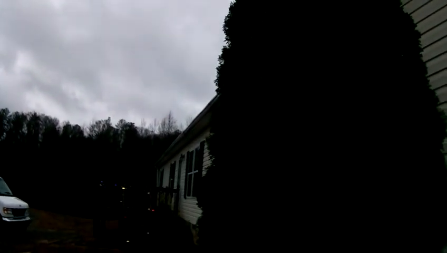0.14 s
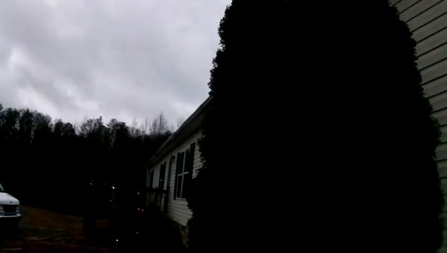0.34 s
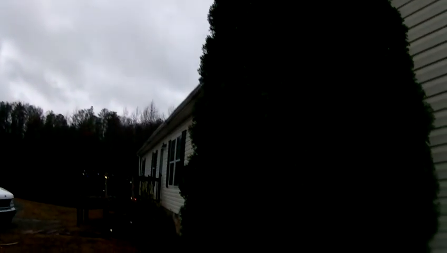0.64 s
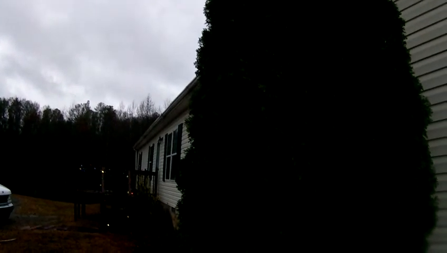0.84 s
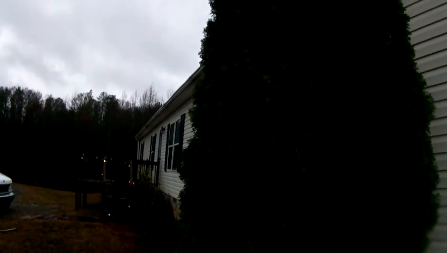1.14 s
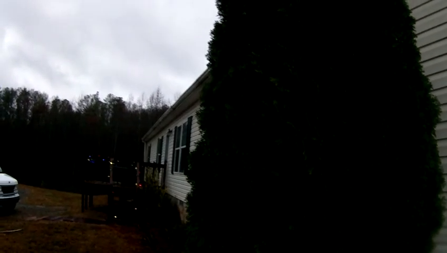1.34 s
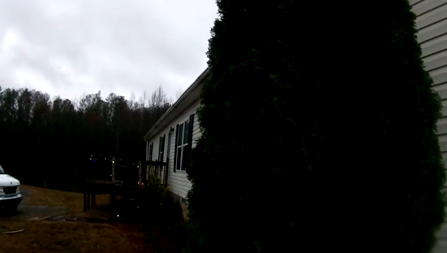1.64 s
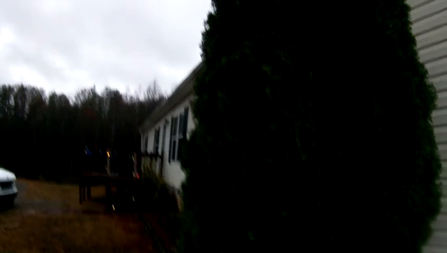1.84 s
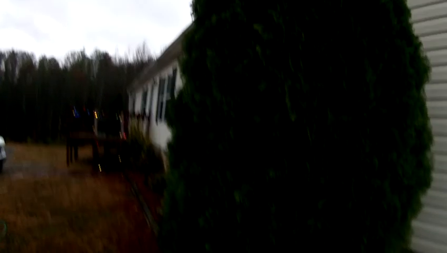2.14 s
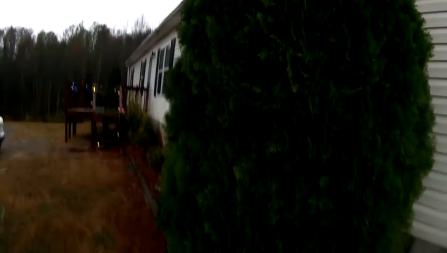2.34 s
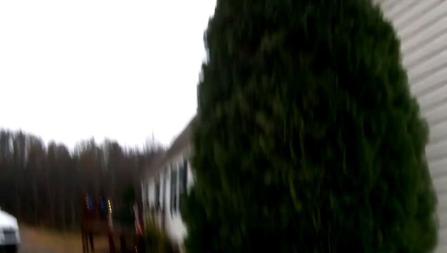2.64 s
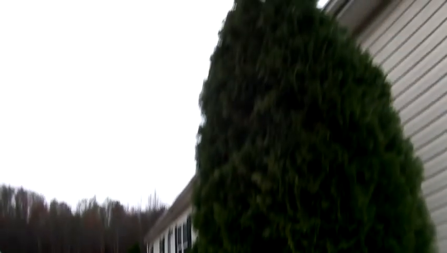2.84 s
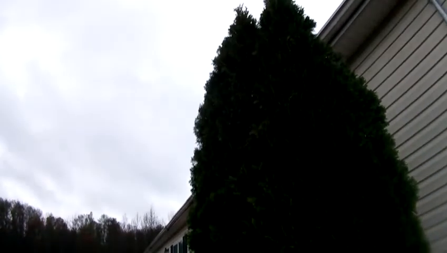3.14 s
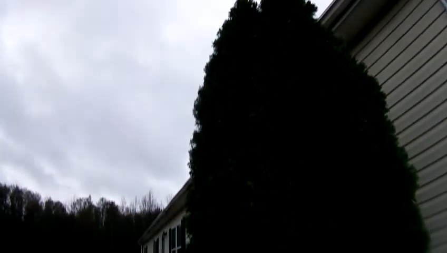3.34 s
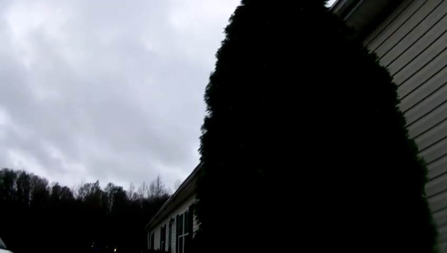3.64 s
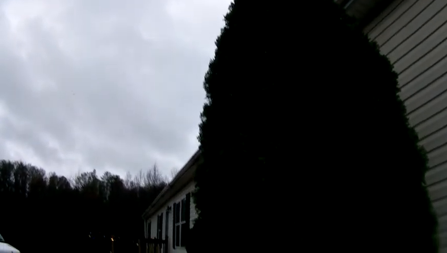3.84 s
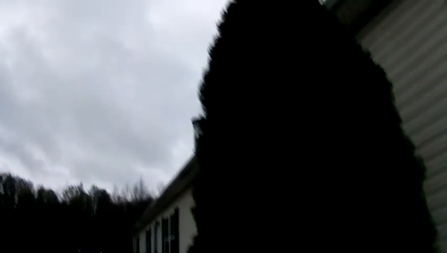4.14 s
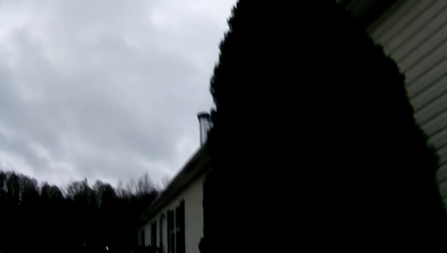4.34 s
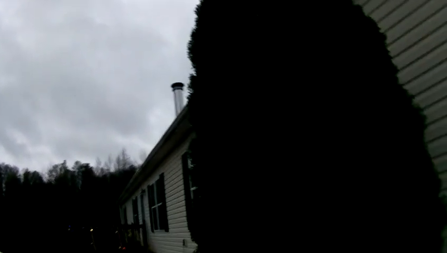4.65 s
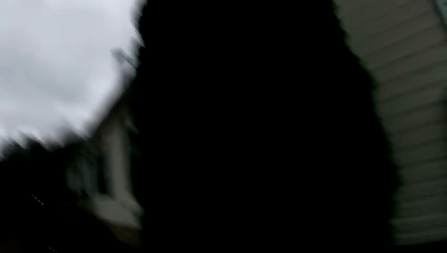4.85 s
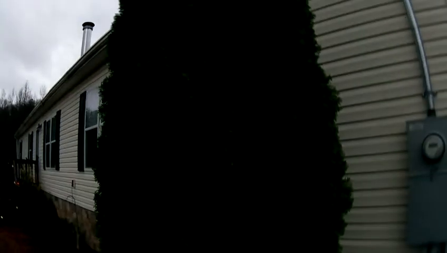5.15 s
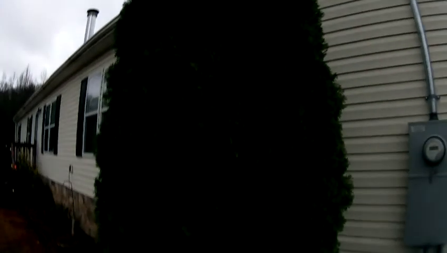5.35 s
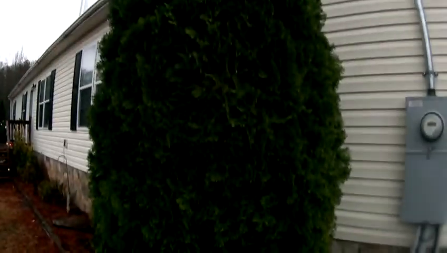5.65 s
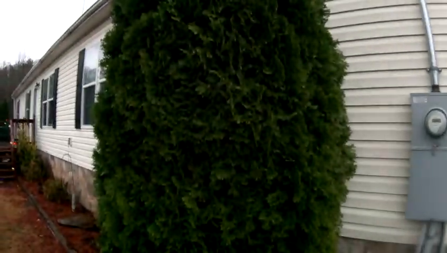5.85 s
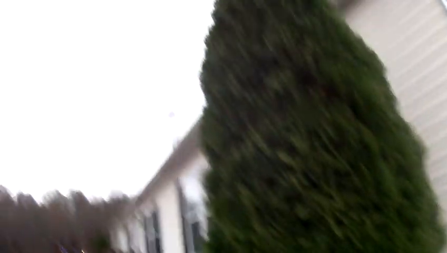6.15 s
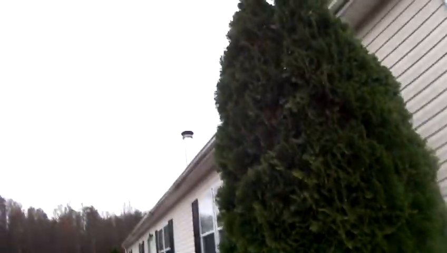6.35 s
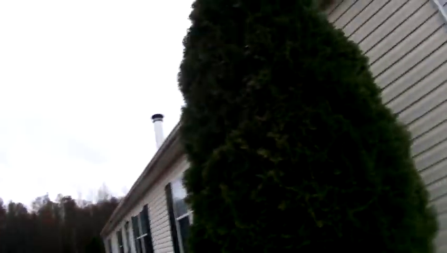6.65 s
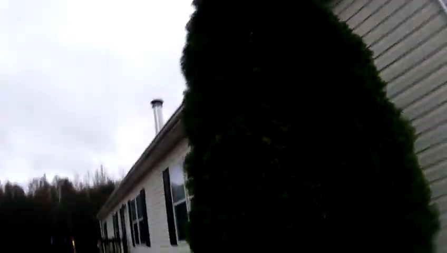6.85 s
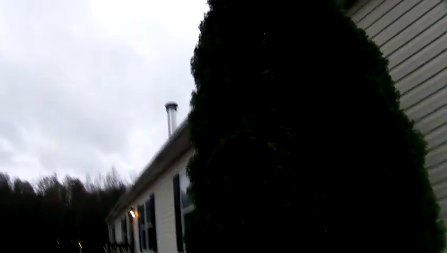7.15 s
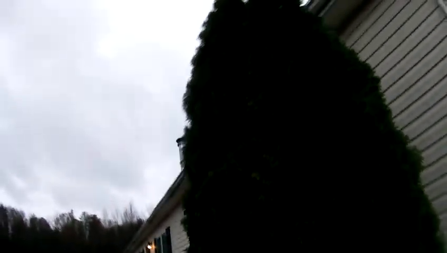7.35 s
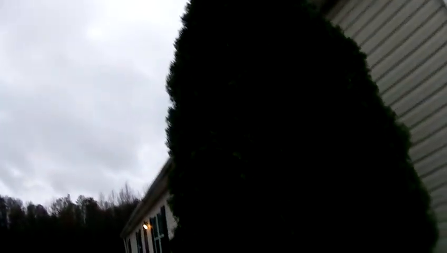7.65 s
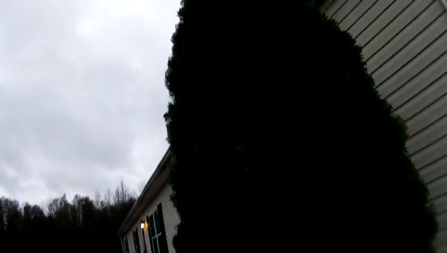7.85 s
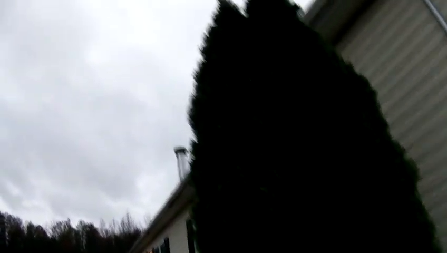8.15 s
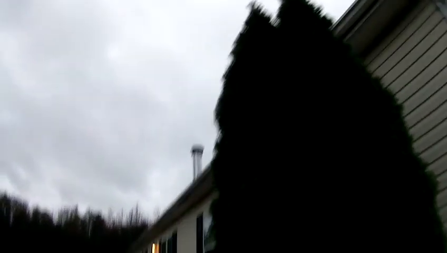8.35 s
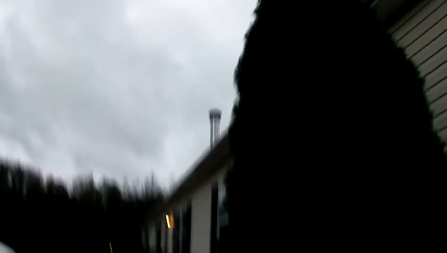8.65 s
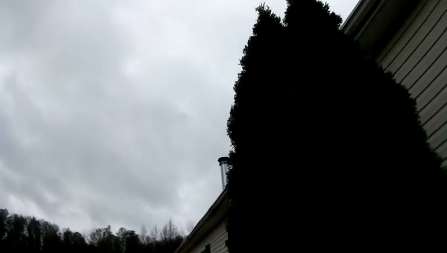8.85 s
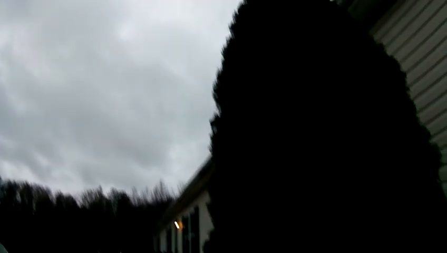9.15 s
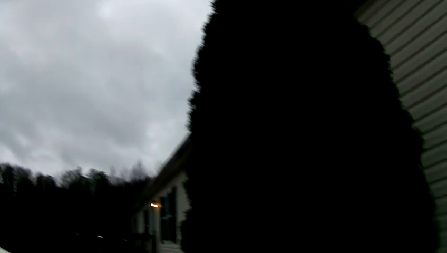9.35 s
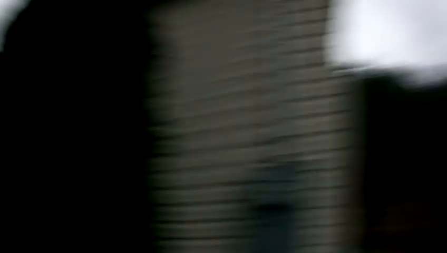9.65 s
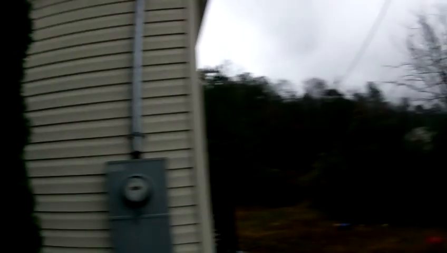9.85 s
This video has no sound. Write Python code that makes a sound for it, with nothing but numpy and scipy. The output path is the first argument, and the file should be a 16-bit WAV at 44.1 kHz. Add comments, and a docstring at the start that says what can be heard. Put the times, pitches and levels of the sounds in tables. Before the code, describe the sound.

Outdoors beside a house, light rain falls in scattered drops on and around a hand-held microphone. Fine drops tick crisply, fat ones thud and tock with a thin zing, over faint distant patter. Low wind rumble, trees and wet hiss continue throughout. Bass gusts buffet early and again past eight seconds, with small taps and grip rubs in the second half.

```python
"""Light rain by a house

Sparse drops land on and right around a hand-held camera: fat ones thud and tock as decaying surface
modes, fine ones tick as noise splashes with a brief high ring, and random pips and splashes patter behind.
Shaped noise makes a low rumble, wind in the trees, wet hiss and a few bass gusts on the single microphone.
Damped modes make soft low thumps as gusts strike it and dull taps on the housing; the shifting grip rubs
and scratches in short noise strokes."""
import sys
import numpy as np
from scipy import signal
from scipy.fft import rfft, irfft, next_fast_len
from scipy.io import wavfile
from scipy.ndimage import map_coordinates

SR = 44100
rng = np.random.default_rng(int(sys.argv[2]) if len(sys.argv) > 2 else 0)


def waveform_to_disk(signal):
    """Save audio, clipped to [-1, 1], as 16-bit WAV at the path in sys.argv[1]."""
    frames = np.transpose(np.atleast_2d(signal))
    scaled = np.clip(frames, -1, 1) * 32767
    samples = np.round(scaled).astype(np.int16)
    wavfile.write(sys.argv[1], SR, samples)


N = 441000
DROP_TIME_S = np.arange(SR // 10) / SR  # time within one short sound


def amp(db):
    """Decibels to gain."""
    return 10 ** (np.asarray(db) / 20)


def unit(x):
    """Scale to rms 1."""
    return x / np.sqrt(np.mean(x ** 2) + 1e-20)


def burst(x):
    """Scale a short sound to the energy of 10 ms at rms 1."""
    return x * np.sqrt(SR / 100 / (np.sum(x ** 2) + 1e-20))


def wobble(knots_per_s):
    """Smooth random curve through normally distributed knots."""
    knots = rng.standard_normal(int(N * knots_per_s / SR) + 4)
    return map_coordinates(knots, [np.arange(N) * knots_per_s / SR])


def coloured(x, points):
    """Causal minimum-phase filter whose gain follows (Hz, dB) points on a log-frequency axis."""
    m = 2 * next_fast_len(N // 2 + SR // 10)
    hz, db = np.transpose(points)
    log_hz = np.log(np.fft.rfftfreq(m, 1 / SR) + 1)
    gain = amp(np.interp(log_hz, np.log(hz), db))
    # folding the cepstrum onto positive time gives minimum phase
    cepstrum = irfft(np.log(gain), m)
    cepstrum[1:m // 2] *= 2
    cepstrum[m // 2 + 1:] = 0
    response = np.exp(rfft(cepstrum))
    return irfft(rfft(x, m) * response, m)[:N]


def noise(points):
    """Coloured noise of rms 1."""
    return unit(coloured(rng.standard_normal(N), points))


def add(track, start_s, sound):
    """Mix a sound into a track, cut at the track's end."""
    start = int(np.clip(round(start_s * SR), 0, N - 1))
    track[start:start + len(sound)] += sound[:N - start]


def ring(hz, cycles, rise, linger_db):
    """Surface mode: swells over rise cycles, falls 60 dB in cycles, plus a tail falling half as fast."""
    turns = hz * DROP_TIME_S
    fall = amp(-60 * turns / cycles)
    tail = amp(linger_db - 30 * turns / cycles)
    swell = 1 - np.exp(-turns / rise)
    motion = np.sin(2 * np.pi * turns) * (fall + tail) * swell
    return burst(np.diff(motion, prepend=0))  # pressure follows the surface's speed


def splash(hz, t60_s, spray_db, spray_t60_s):
    """Band-passed noise: the drop bursts in a sharp crack, then its spray settles."""
    crack = amp(-60 * DROP_TIME_S / t60_s)
    spray = amp(spray_db - 60 * DROP_TIME_S / spray_t60_s)
    band_hz = np.clip([hz / 2, hz * 2], [100, 1000], [9000, 19000])
    b, a = signal.butter(1, band_hz, "bandpass", fs=SR)
    return burst(signal.lfilter(b, a, rng.standard_normal(len(DROP_TIME_S)) * (crack + spray)))


# Noise spectra, level set separately. Each row: frequency in Hz, relative density in dB per Hz.
RUMBLE_SPECTRUM = [(10, -27.5), (22, -3), (50, -1.5), (95, -0.5), (135, -5), (190, -13), (400, -29),
                   (900, -63.5)]
TREES_SPECTRUM = [(60, -24), (150, -2), (250, -1), (400, -6.5), (650, -10.5), (1000, -17), (1400, -28),
                  (2500, -36.5), (6000, -73.5)]
HISS_SPECTRUM = [(300, -2), (1500, -1.5), (2800, 0), (4000, 2.5), (6500, -10), (8000, -2), (10000, -7),
                 (13500, -16), (16000, -15)]
RUMBLE_DB, TREES_DB, HISS_DB = -50, -54, -75.5  # centres of the wandering levels


def wind():
    """Noise with wandering level: rumble on the microphone, wind in the trees, hiss of distant rain."""
    rumble = amp(RUMBLE_DB + 0.6 * wobble(4) + 1.1 * wobble(14)) * noise(RUMBLE_SPECTRUM)
    trees = amp(TREES_DB + 1.28 * wobble(25)) * noise(TREES_SPECTRUM)
    hiss = amp(HISS_DB + 1.94 * wobble(39)) * noise(HISS_SPECTRUM)
    return rumble + trees + hiss


# Gusts on the microphone. Each row: start in seconds, hold in seconds, level in dB before the wobble.
GUST_EVENTS = [(0.048, .05, -45), (0.225, 0.19, -38.5), (.75, 0.065, -50), (3.86, .04, -48),
               (4.953, .3, -47), (7.193, .12, -47.5), (8.22, 0.25, -39.5)]
# Gust noise. Each row: frequency in Hz, relative density in dB per Hz.
GUST_SPECTRUM = [(10, -18), (25, -3.5), (50, 1), (100, -1.5), (150, -7), (220, -21.5), (500, -37.5),
                 (1500, -62)]
GUST_ATTACK_S, GUST_RELEASE_S, GUST_SAG_DB = 0.04, 0.13, 3.5


def gusts():
    """Each gust is a lumpy swell of deep bass noise: quick attack, sagging hold, slower release."""
    level = np.zeros(N)
    for start_s, hold_s, db in GUST_EVENTS:
        times_s = start_s + np.cumsum([0, GUST_ATTACK_S, hold_s, GUST_RELEASE_S])
        level += np.interp(np.arange(N) / SR, times_s, [0, amp(db), amp(db - GUST_SAG_DB), 0])
    return level * amp(1.5 * wobble(22)) * noise(GUST_SPECTRUM)


# Soft low thumps as gusts strike the microphone, and dull taps on the housing.
# Each row: start in seconds, mode in Hz, level in dB before the low-pass.
LOW_THUMPS_AND_TAPS = [(0.295, 103, -36), (0.387, 84, -36.5), (4.8292, 935, -49.5), (6.913, 910, -46),
                       (7.237, 330, -39), (7.281, 384, -45), (8.254, 71, -30.5), (8.402, 468, -46)]
SOFT_HZ = 1080  # low-pass that dulls them


def thumps_and_taps():
    """Quickly damped modes behind a low-pass, so they sound soft and dull."""
    track = np.zeros(N)
    for start_s, hz, db in LOW_THUMPS_AND_TAPS:
        add(track, start_s, amp(db) * ring(hz, cycles=5.4, rise=0.28, linger_db=-27))
    b, a = signal.butter(2, SOFT_HZ, fs=SR)
    return signal.lfilter(b, a, track)


# Grip shifts. Each row: start in seconds, length in seconds, rub level in dB, scratch level in dB;
# both levels before the stroke shape and slips.
GRIP_STROKES = [(4.785, 0.076, -48.5, -78), (4.964, 0.025, -43.5, -75), (6.042, 0.039, -75, -64),
                (6.914, 0.03, -50, -78), (8.04, 0.17, -62.5, -69), (8.255, 0.27, -54, -70.5),
                (8.307, 0.029, -51, -59.5)]
# Stroke noise. Each row: frequency in Hz, relative density in dB per Hz.
RUB_SPECTRUM = [(100, -25), (450, 19), (1050, 4.5), (1700, -21), (4000, -21), (15000, -33)]
SCRATCH_SPECTRUM = [(1000, -21), (2500, -10), (3900, 10), (5500, -16), (8000, 5), (10000, -30), (12000, 3),
                    (15000, -4.5)]


def grip_shifts():
    """The hand rubs and scratches the housing: noise strokes whose level jumps as they catch and slip."""
    rub, scratch = np.zeros((2, N))
    for start_s, length_s, rub_db, scratch_db in GRIP_STROKES:
        stroke = np.sqrt(np.abs(np.hanning(int(length_s * SR))))
        add(rub, start_s, amp(rub_db) * stroke)
        add(scratch, start_s, amp(scratch_db) * stroke)
    slips = unit(amp(7.1 * np.tanh(wobble(200))))
    return slips * (rub * noise(RUB_SPECTRUM) + scratch * noise(SCRATCH_SPECTRUM))


def patter(count, level_db, centre_hz):
    """Drops farther off, at random times: each mixes a pip and a splash, wetter with hardness."""
    track = np.zeros(N)
    for when, size, pitch, hardness in rng.random((count, 4)):
        pip_hz = centre_hz * 2 ** (2.2 * (pitch - 0.5))
        pip = ring(pip_hz, cycles=13.5, rise=0.74, linger_db=-20)
        wet = splash(3000 * 2 ** (2.0 * hardness), t60_s=0.013, spray_db=-8, spray_t60_s=0.028)
        strength = amp(level_db + 12 * size ** 3)  # few are strong
        add(track, when * N / SR, strength * ((1 - hardness) * pip + hardness * wet))
    return track


# Splash colour of fine and fat drops. Each row: frequency in Hz, gain in dB.
SPLASH_GAIN = [(100, -22), (700, 14.5), (1800, 5.5), (3000, -1), (5000, 0), (8000, -1), (12000, -5.5),
               (16000, -14)]
# Fine drops. Each row: start in seconds, ring in Hz, ring level in dB, splash level in dB;
# both levels before the trims and colour below.
FINE_DROP_EVENTS = [(0.3373, 3830, -59, -65), (0.479, 2250, -52, -68), (0.6364, 3600, -48, -54),
                    (0.852, 1180, -43, -49), (0.8858, 1630, -51, -47), (1.4698, 1630, -57, -54),
                    (1.9876, 3870, -59.5, -58.5), (2.2137, 1400, -55, -57), (2.2845, 1580, -54.5, -62),
                    (2.5612, 4170, -53.5, -49), (2.9315, 1810, -54, -52), (3.098, 3530, -67, -59),
                    (3.1289, 1700, -57, -72), (3.2626, 1860, -51, -50.5), (3.3373, 1640, -48, -59.5),
                    (3.4888, 1720, -58, -64), (3.5288, 3900, -60, -54), (3.5909, 1570, -41.5, -50.5),
                    (3.5936, 1340, -50, -36.5), (3.8032, 2060, -58, -67), (4.2614, 3900, -54.5, -56),
                    (4.386, 2000, -48, -59.5), (4.5719, 1600, -39, -47.5), (4.8063, 1100, -45.5, -61),
                    (5.0569, 1590, -48, -52), (5.5501, 1730, -57, -68), (5.6066, 1530, -59, -46),
                    (5.641, 1600, -58, -56), (5.678, 1210, -54, -53), (5.7763, 1200, -55, -60),
                    (5.862, 1210, -58, -56), (5.9178, 4040, -61, -50), (6.0598, 3620, -52.5, -79),
                    (6.2796, 1100, -58.5, -63.5), (6.3346, 1130, -44.5, -47.5), (6.546, 3680, -60, -68),
                    (6.7222, 1700, -62, -60), (7.6746, 1790, -57, -66), (7.8228, 1320, -49, -56),
                    (7.8498, 1200, -61, -57), (8.4862, 960, -49, -64), (8.577, 1930, -54, -69),
                    (8.7463, 1290, -57.5, -63), (8.8263, 4030, -57, -47), (9.4412, 3970, -63, -62),
                    (9.6292, 1200, -52, -59), (9.6402, 1220, -45.5, -44.5), (9.642, 2500, -48, -59)]
FINE_SPLASH_HZ, BRIGHTER_OCT_PER_DB = 4600, 0.1  # centre at equal levels; rises with splash over ring


def fine_drops():
    """Small drops tick: a short noise splash with a brief high surface ring."""
    body, spray = np.zeros(N), np.zeros(N)
    for start_s, ring_hz, ring_db, splash_db in FINE_DROP_EVENTS:
        splash_hz = FINE_SPLASH_HZ * 2 ** (BRIGHTER_OCT_PER_DB * (splash_db - ring_db))
        tick = ring(ring_hz, cycles=11.4, rise=1.6, linger_db=-18)
        wet = splash(splash_hz, t60_s=0.0032, spray_db=-10, spray_t60_s=0.019)
        add(body, start_s, amp(ring_db - 5.0) * tick)
        add(spray, start_s, amp(splash_db) * wet)
    return body + amp(-0.65) * coloured(spray, SPLASH_GAIN)


# Fat drops close by. Each row: start in seconds, thud in Hz, thud level in dB, tock in Hz,
# tock level in dB, splash level in dB; all levels before the trims and colour below.
FAT_DROP_EVENTS = [(0.4786, 444, -44, 970, -45.5, -69), (0.8047, 450, -42.5, 930, -46.5, -58),
                   (2.022, 248, -31.5, 915, -41, -51.5), (2.4576, 192, -37, 750, -48.5, -56),
                   (2.6186, 390, -46, 730, -50, -46), (2.7076, 430, -45.5, 970, -51, -48.5),
                   (2.822, 506, -34.5, 1184, -41, -51), (2.9254, 300, -43.5, 1000, -54, -43),
                   (3.014, 540, -21, 738, -29, -38), (3.7254, 210, -40.5, 755, -50.5, -57),
                   (4.0194, 646, -34.5, 755, -37.5, -42.5), (4.145, 538, -27, 736, -39, -43),
                   (4.1587, 239, -33.5, 740, -45, -55), (4.2038, 510, -35.5, 1320, -40.5, -43.5),
                   (4.6355, 503, -40.5, 756, -59, -40.5), (4.7114, 236, -42.5, 1040, -49, -50.5),
                   (4.7308, 620, -42, 967, -38, -42), (5.0067, 700, -39.5, 850, -35.5, -53),
                   (5.0208, 520, -39, 1010, -36.5, -49), (5.1286, 250, -46, 730, -50, -56),
                   (5.6692, 280, -48, 1010, -35.5, -39), (5.71, 226, -22.5, 950, -29.5, -37),
                   (5.8178, 550, -46, 945, -43.5, -55), (5.911, 480, -40, 734, -57, -58),
                   (6.8553, 569, -44, 920, -42.5, -66), (7.522, 402, -42, 740, -45, -65.5),
                   (7.6052, 256, -28.5, 785, -37.5, -48.5), (8.5108, 376, -48, 1070, -46.5, -49),
                   (8.5438, 490, -47.5, 990, -47, -59), (9.98, 675, -39, 785, -51, -53.5)]
FAT_SPLASH_HZ, FAT_SPLASH_DB, DARKER_OCT_PER_DB = 4100, -46, 0.01  # louder splashes are darker
BODY_DELAY_S = 0.00027  # the surface answers just after the crack
OVERTONE_DB = -12.5


def fat_drops():
    """Heavy drops ring a low and a middle mode with an overtone each; pitch depends on where they land."""
    body, spray = np.zeros(N), np.zeros(N)
    for start_s, thud_hz, thud_db, tock_hz, tock_db, splash_db in FAT_DROP_EVENTS:
        splash_hz = FAT_SPLASH_HZ * 2 ** (-DARKER_OCT_PER_DB * (splash_db - FAT_SPLASH_DB))
        thud = ring(thud_hz, cycles=8.6, rise=0.22, linger_db=-5.0)
        thud += amp(OVERTONE_DB) * ring(thud_hz * 2.11, cycles=22, rise=1.0, linger_db=-18)
        tock = ring(tock_hz, cycles=13.4, rise=0.61, linger_db=-16.0)
        tock += amp(OVERTONE_DB) * ring(tock_hz * 2.276, cycles=21, rise=0.78, linger_db=-11)
        wet = splash(splash_hz, t60_s=0.008, spray_db=-21, spray_t60_s=0.015)
        add(body, start_s + BODY_DELAY_S, amp(thud_db - 2) * thud + amp(tock_db - 2.5) * tock)
        add(spray, start_s, amp(splash_db) * wet)
    return body + amp(-0.86) * coloured(spray, SPLASH_GAIN)


def scene():
    """One microphone feeds both channels."""
    rain = fat_drops() + fine_drops() + patter(count=260, level_db=-71.5, centre_hz=2290)
    mono = rain + wind() + gusts() + thumps_and_taps() + grip_shifts()
    return np.array([mono, mono])


# Microphone behind its port. Each row: frequency in Hz, gain in dB.
PORT_GAIN = [(2200, 0), (2900, 0), (3950, 4), (4600, -1), (5350, 0), (5950, -14.5), (6600, -2.5),
             (7400, -4.5), (8000, 0), (9300, -8.5), (12000, -8.5), (14500, -10.5)]
CHANNEL_HISS_DB = -81.5  # before the port
MIRROR_HZ, MIRROR_DB = 12000, 0.94
TOP_HZ = 15900


def record(dry):
    """Hiss in each channel, port colour, a treble mirror of the sound, and the band limit."""
    heard = []
    for channel in dry:
        hiss = amp(CHANNEL_HISS_DB) * rng.standard_normal(N)
        heard.append(coloured(channel + hiss, PORT_GAIN))
    heard = np.array(heard)
    # slightly uneven sampling mirrors the slope around one high frequency: thuds get a thin zing
    slope = np.diff(heard, prepend=0)
    carrier = np.cos(2 * np.pi * MIRROR_HZ * np.arange(N) / SR)
    heard = heard + amp(MIRROR_DB) * slope * carrier
    m = next_fast_len(N + SR // 10)
    in_band = np.fft.rfftfreq(m, 1 / SR) < TOP_HZ
    return irfft(rfft(heard, m) * in_band, m)[:, :N]


dry = scene()
out = record(dry)
waveform_to_disk(out)
```